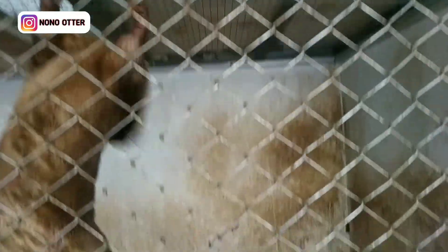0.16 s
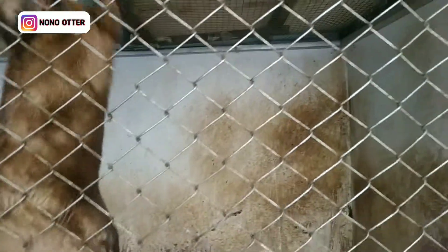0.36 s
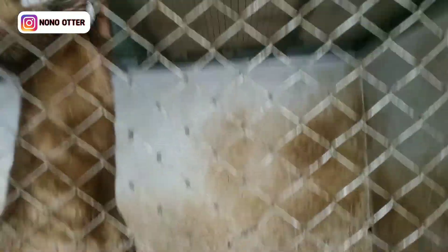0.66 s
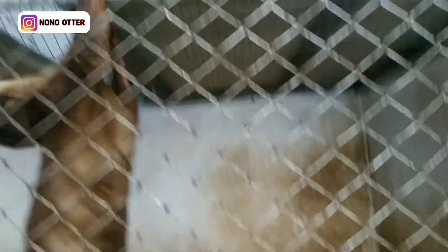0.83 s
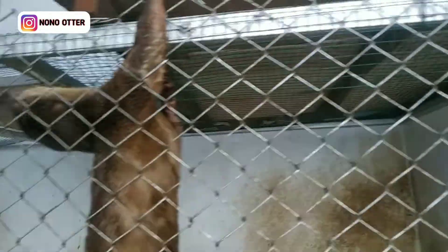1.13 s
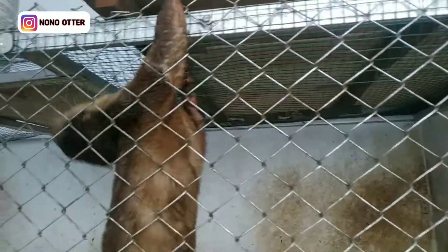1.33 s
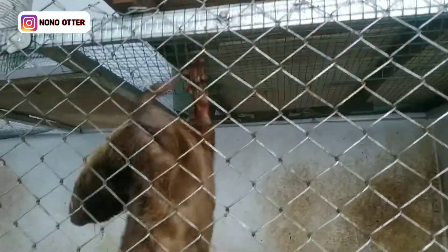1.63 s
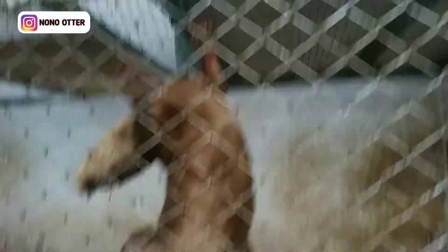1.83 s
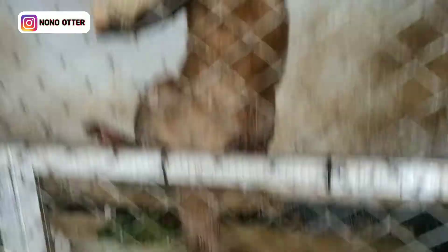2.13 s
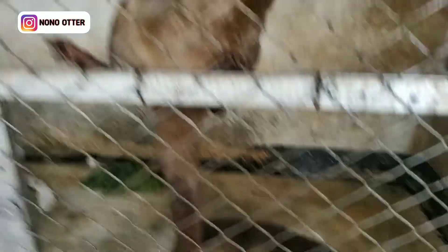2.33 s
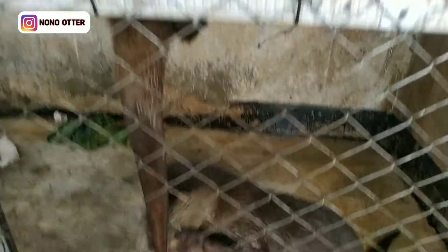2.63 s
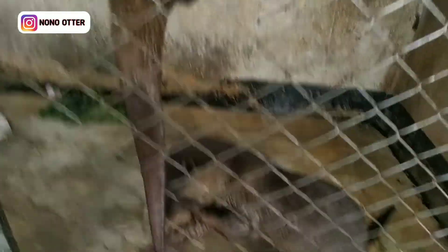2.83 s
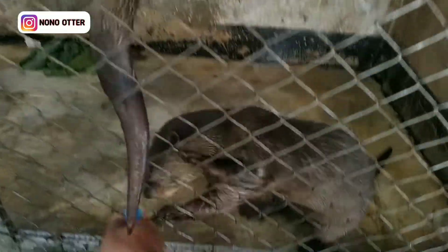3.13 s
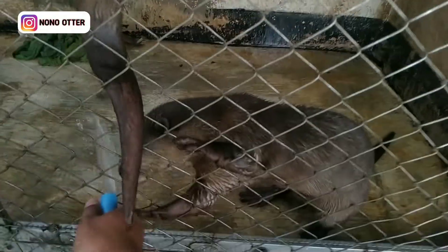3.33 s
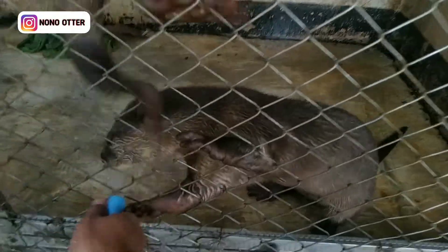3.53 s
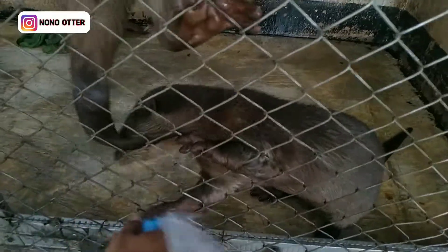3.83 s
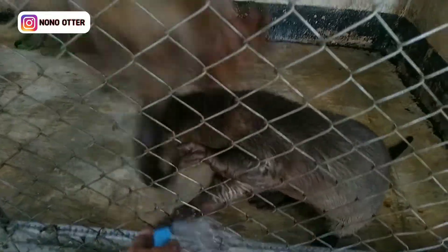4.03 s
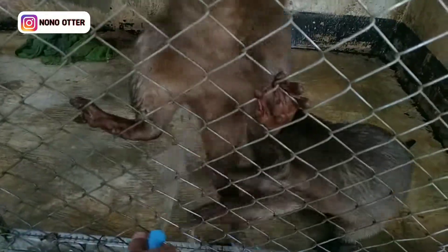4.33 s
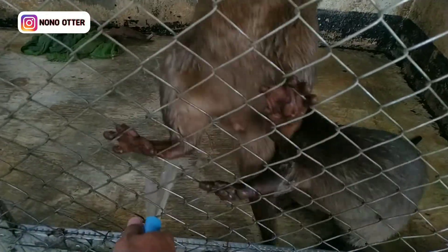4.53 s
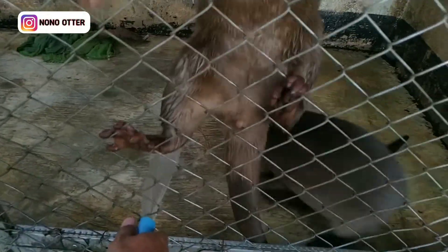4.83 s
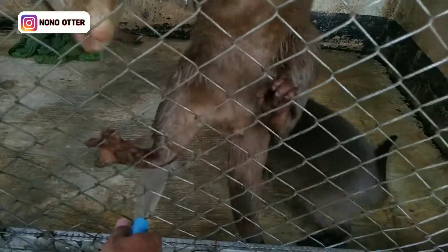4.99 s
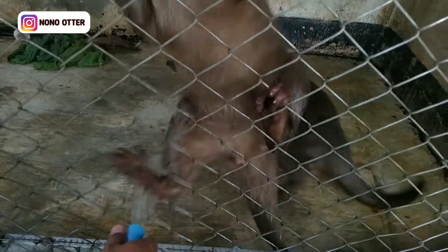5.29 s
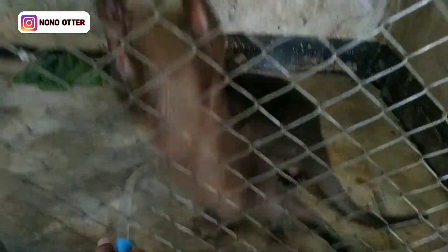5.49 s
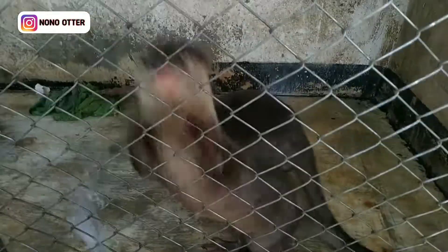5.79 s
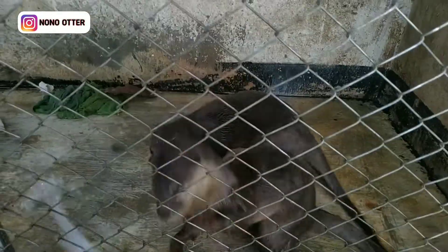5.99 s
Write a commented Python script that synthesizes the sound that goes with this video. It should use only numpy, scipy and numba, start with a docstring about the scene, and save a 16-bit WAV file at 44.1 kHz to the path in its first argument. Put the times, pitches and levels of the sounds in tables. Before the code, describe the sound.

Two small otters chirp, squeal and whine in a ringing concrete cage while a hose sputters and sharp ticks sound on the wire mesh.

```python
"""Small otters beg in a concrete cage with wire mesh while a hose sputters over an outdoor rumble and hum.
A chirp is already falling at the start; ticks on the mesh follow, then a squeal sinks into a long whine.
Falling whistled chirps go on, a second squeal and whine among them; later wet paws pat and the jet slaps.
The last squeal breaks into a whine of pulses and breath in a moving throat, which lasts to the end.
The bare walls ring after each call, and the recorder's gain control ducks the water under loud calls."""
import sys
import numpy as np
from scipy import signal
from scipy.fft import rfft, irfft, next_fast_len
from scipy.io import wavfile
from scipy.ndimage import uniform_filter1d, minimum_filter1d, map_coordinates
from numba import njit

SR = 44100
rng = np.random.default_rng(int(sys.argv[2]) if len(sys.argv) > 2 else 0)


def pcm_store(signal):
    """Save signal as 16-bit PCM."""
    levels = np.round(np.clip(np.atleast_2d(signal), -1, 1) * 32767)
    wavfile.write(sys.argv[1], SR, levels.astype(np.int16).T)


N = 271201
TIME = np.arange(N) / SR
EDGE_HZ = 15850  # upper band limit
LEAD_S = .1  # calls may begin this long before the scene opens


def amp(db):
    """Decibels to gain."""
    return 10 ** (np.asarray(db) / 20)


def unit(x):
    """Scales to rms 1."""
    return x / np.sqrt(np.mean(x ** 2) + 1e-20)


def read(points, hz):
    """Reads a table on a log-frequency axis."""
    f, value = np.transpose(points)
    return np.interp(np.log(hz + 1), np.log(f + 1), value)


def add(mix, s, sound):
    """Mixes a sound in at time s."""
    part = mix[..., max(round(s * SR), 0):][..., :sound.shape[-1]]
    part += sound[..., :part.shape[-1]]


def wander(size, rate):
    """A smooth random curve of rms about 1 that changes about rate times a second."""
    knots = rng.standard_normal(size + 8)[:int(size * rate / SR) + 8]
    position = np.arange(size) * rate / SR + 2
    return map_coordinates(knots, [position], order=2, mode="nearest")


def resonate(x, modes):
    """Passes a sound through parallel resonances with steep skirts."""
    out = 0
    for hz, width, db in modes:
        # two passes narrow the peak, so each one is 1.55 times as wide
        b, a = signal.iirpeak(min(hz, SR / 2.2), hz / width / 1.55, SR)
        once = signal.lfilter(b, a, x)
        out = out + amp(db) * signal.lfilter(b, a, once)
    return out


def glide(x, hz, width):
    """A steep resonance that follows the curve hz: shifted to zero, smoothed twice, shifted back."""
    turn = np.exp(2j * np.pi * np.cumsum(hz) / SR)
    r = np.exp(-np.pi * width * 1.55 / SR)
    smoothed = signal.lfilter([(1 - r) ** 2], [1, -2 * r, r * r], x / turn)
    return 2 * (turn * smoothed).real


def controls(rows, fade_s=.006):
    """A call's start, soft edges and control curves, sample by sample."""
    s, *columns = np.transpose(rows)
    t = np.arange(s.min(), s.max() + .003, 1 / SR)
    to_edge = np.minimum(t - t[0], t[-1] - t)
    edges = np.sin(np.pi / 2 * np.clip(to_edge / fade_s, 0, 1)) ** 2
    return t[0], edges, [np.interp(t, s, c) for c in columns]


# the chirps, each a top note, a tumble and a gliding low note:
# (start [s], top [s], fall [s], low [s], opening pitch [Hz], top pitch [Hz], pitch as the fall begins [Hz],
#  low pitch [Hz], end pitch [Hz], base level of top [dB], of fall [dB], of low [dB],
#  level of the direct path [dB], lag of the left microphone [samples])
CHIRP_CALLS = [(-.098, 0.013, 0.081, 0.017, 7690, 7840, 7970, 4100, 4350, -6.5, 0.5, -13.5, -3, 1),
               (1.244, 0.049, 0.043, 0.022, 7900, 8350, 7770, 4615, 4465, -8, -6, 0, -13, 1),
               (2.178, 0.037, 0.043, 0.027, 9280, 8350, 8420, 4274, 3930, -4.5, 2, -3, -7, 0),
               (2.754, 0.028, 0.048, 0.02, 8400, 8250, 8100, 4185, 3940, -4, -3.5, -11, -7.5, 1),
               (3.297, 0.036, 0.038, 0.029, 8520, 9040, 8560, 4920, 3500, -1.5, 4.5, 1, -7.5, 2),
               (3.785, 0.03, 0.04, 0.033, 8080, 8570, 8850, 5020, 3470, -3, -5.5, 0, -5.5, 2),
               (4.79, 0.041, 0.031, 0.013, 7960, 8390, 8500, 4660, 4410, -1, 2, 1, -5.5, 1),
               (5.529, 0.02, 0.034, 0.019, 9700, 9170, 8730, 4680, 4400, -9.5, -4.5, -3, -4, 0)]


def chirping_otter():
    """The nearer otter, already calling: each chirp arrives directly at its own strength and rings the cage."""
    lead = round(LEAD_S * SR)
    chirps, direct = np.zeros(lead + N), np.zeros((2, lead + N))
    for *shape, facing_db, lag in CHIRP_CALLS:
        start, sound = whistle(chirp(*shape), jitter=.009, jitter_rate=900, shimmer=1.6, flutter_db=1.5,
                               third_db=-25, half_db=-40, hoarse_db=-24)
        add(chirps, start + LEAD_S, sound)
        heard = ears(sound, balance_db=2.0, count=max(round(lag), 0))
        add(direct, start + LEAD_S, amp(facing_db) * heard)
    return (direct + cage(chirps, tail_db=-15.5))[:, lead:]


# one curve a squeal, the falling start of a whine:
# (time [s], pitch [Hz], level [dB], roughness [0-1], second harmonic [dB re the fundamental])
SQUEAL_CURVES = [
    [(.775, 5500, -32, 0.5, -20), (.793, 6660, -25, .4, -14), (.811, 5400, -20, 0.58, 8),
     (.822, 3910, -11, 0.48, -11), (.853, 2318, -9, 0.26, -7), (.868, 2070, -23, 0.7, -14),
     (.89, 1640, -45, 0.7, -6), (.95, 1602, -37, 0.3, -4), (1.0, 1030, -44, 0.4, 11)],
    [(2.572, 5500, -29, 0.54, 1), (2.598, 5700, -23.5, 0.63, 6.5), (2.611, 3880, -22.5, 0.9, 4),
     (2.622, 2790, -15, 0.84, -11), (2.645, 2400, -28, 0.84, -23), (2.67, 1960, -23, 0.3, -24)],
    [(5.835, 5350, -23, 0.56, -19), (5.85, 4000, -28.5, 0.5, -7), (5.868, 3184, -31, 0.4, 4.5),
     (5.905, 3400, -24.5, 0, -6), (5.935, 3137, -36, 0.74, -4), (5.96, 2544, -19.5, 0.4, -3),
     (5.982, 2370, -25.5, 0.78, 2.5), (6.0, 2250, -38, 0.9, -16)],
]
# one curve a whine: (time [s], pitch [Hz], relative level of the throat [dB], roughness [0-1],
#  relative level of the open mouth's rasp [dB], limp of the pulses [0-1], factor on the throat's resonances [-])
WHINE_CURVES = [
    [(.995, 499, -28, .15, -42, .1, 0.93), (1.06, 594.3, -32.5, 0.17, -24, 0.07, 1.08),
     (1.15, 643.6, -30, 0.15, -21, 0.35, 0.87), (1.24, 663.5, -23, 0.23, -19.5, 0.35, 0.93),
     (1.32, 640, -27.5, 0.17, -27.5, 0.8, 0.82), (1.42, 626, -31, 0.26, -19.5, 0.97, 0.91),
     (1.48, 612.6, -17, 0.52, -22, 0.95, 1.02), (1.6, 599, -17.5, 0.56, -22, 0.55, 1.01),
     (1.655, 609.4, -19.5, 0.26, -37, 0.18, 1.05), (1.68, 620, -25, 0.23, -36, 0.6, 1.09),
     (1.73, 657.7, -15.5, 0.31, -22.5, 0.45, 1.054), (1.79, 647.6, -17.5, 0.39, -28, 0.2, 1.01),
     (1.84, 631.3, -22, 0.4, -41, 0.18, 0.83), (1.868, 626, -26.5, 0.2, -41, 0, 0.88),
     (1.882, 555.5, -47, .4, -42, 0.3, .92)],
    [(2.665, 980, -17.5, 0.04, -23, 0, 1), (2.72, 1096, -15, 0.26, -21.5, .1, 0.97),
     (2.748, 1082, -15, 0.34, -18, 0, 1), (2.768, 1017, -32, 0.4, -18, .1, 0.96)],
    [(2.772, 1086, -22, 0.1, -17, .1, 1), (2.795, 1153, -30, 0.3, -19, 0, 0.75),
     (2.82, 1057, -14.5, 0.17, -17, 0.3, 0.98), (2.834, 1024, -19, 0.03, -22, 0.4, 1),
     (2.865, 1109, -18.5, 0.05, -18, 0.2, 1), (2.91, 938.5, -18, 0, -35, 0, .93),
     (2.957, 953, -21, 0, -34, 0, 0.895), (2.968, 824, -28, 0.1, -36, 0, 0.89),
     (2.984, 770, -33, .05, -40, .1, 0.69)],
    [(5.985, 1102, -19, 0.2, -21, 0, 1.16), (6.005, 1112, -9, 0, -26, 0.1, 1.08),
     (6.022, 1085, -25, 0, -26, 0.2, 1.03), (6.042, 1135, -14, 0, -24, 0, 1.03),
     (6.06, 1230, -19.5, .35, -22, 0.1, 1.05), (6.085, 1108, -15, 0.18, -28, 0.25, 1.04),
     (6.112, 1101, -15, 0.01, -15.5, .15, 0.98), (6.131, 1096, -24, 0, -27, 0.3, 1.04),
     (6.147, 1100, -11.5, 0, -16, .15, 0.98)],
]


def whining_otter():
    """The other otter: breathy squeals and pulsed whines, heard directly and in the cage's strong ring."""
    lead = round(LEAD_S * SR)
    squeals, whines = np.zeros((2, lead + N))
    for rows in SQUEAL_CURVES:
        start, sound = whistle(rows, jitter=.018, jitter_rate=1500, shimmer=3, flutter_db=4,
                               third_db=-5, half_db=-15, hoarse_db=-8)
        add(squeals, start + LEAD_S, breathy(sound))
    for rows in WHINE_CURVES:
        start, sound = whine(rows)
        add(whines, start + LEAD_S, amp(-2.0) * sound)
    direct = ears(squeals, balance_db=5.0, count=2) + ears(whines, balance_db=0.0, count=4)
    return (direct + cage(squeals + whines, tail_db=-4.5))[:, lead:]


SETTLE_S = 0.0105  # the opening pitch gives way to the top note
SWELL_S, SWELL_DB = 0.013, -6.5  # the top note swells from this far below
LOW_DB_PER_OCTAVE = 54  # the low note's level follows its glide
WAVER, WAVER_PER_S = 0.0142, 139.5  # unsteadiness of pitch after the fall (share, per s); half as much early on
TOP_ROUGH, OVERTONE_DB = 0.41, -20  # roughness on the held notes, rising to 1 in the fall; second harmonic
# uneven steps of the fall, with dips in level:
# (share of the fall's time [0-1], height from low to top note [0-1], change of level [dB])
TUMBLE_STEPS = [(0, 1, 6), (.03, .85, -2), (.24, .78, -1), (.3, .68, -11), (.34, .52, 0), (.68, .36, .5),
                (.92, .15, -5), (1, 0, 0)]


def chirp(start, top_s, fall_s, low_s, opening_hz, top_hz, brink_hz, low_hz, end_hz, top_db, fall_db, low_db):
    """The course of one chirp, as rows like a squeal's: it settles on the top note, tumbles and glides out low."""
    t = np.arange(0, top_s + fall_s + low_s, 1 / SR)
    share, heights, steps_db = np.transpose(TUMBLE_STEPS)
    fallen = (t - top_s) / fall_s
    height = np.interp(fallen, share, heights)
    top = np.interp(t, [SETTLE_S, top_s], [top_hz, brink_hz])
    top += (opening_hz - top) * np.exp(-(t / SETTLE_S) ** 10)
    low = low_hz + (end_hz - low_hz) * np.clip((t - top_s - fall_s) / low_s, 0, 1)
    waver = WAVER * np.clip(fallen + .5, .5, 1) * wander(len(t), WAVER_PER_S)
    hz = (low + height * (top - low)) * (1 + waver)
    db = np.interp(fallen, [0, .5, 1], [top_db, fall_db, low_db]) + np.interp(fallen, share, steps_db)
    db += SWELL_DB * np.maximum(1 - t / SWELL_S, 0)
    db += LOW_DB_PER_OCTAVE * np.log2(low / low_hz)
    rough = np.interp(fallen, [0, .5, 1], [TOP_ROUGH, 1, TOP_ROUGH])
    return np.column_stack([start + t, hz, db, rough, np.full(len(t), OVERTONE_DB)])


FLUTTER_PER_S = 260  # a rough cry breaks up at about this rate


def whistle(rows, jitter, jitter_rate, shimmer, flutter_db, third_db, half_db, hoarse_db, hoarse_width_hz=2200):
    """A tone with two overtones; as it roughens it flutters and gains a hoarse skirt and an octave undertone."""
    start, edges, (hz, db, rough, second_db) = controls(rows)
    size, rough = len(hz), np.clip(rough, 0, 1)
    unsteady_hz = hz * (1 + jitter * rough * wander(size, jitter_rate))
    phase = 2 * np.pi * np.cumsum(unsteady_hz) / SR
    tone = np.zeros(size)
    for k, harmonic_db in enumerate([0, second_db, second_db + third_db], 1):
        tone += amp(harmonic_db) * np.sin(k * phase) * (k * hz < SR / 2)
    skirt = wander(size, hoarse_width_hz) * np.sin(phase) + wander(size, hoarse_width_hz) * np.cos(phase)
    undertone = np.sin(phase / 2)
    tone += rough ** 2 * (amp(half_db) * undertone + amp(hoarse_db) * skirt)
    tremble_db = shimmer * wander(size, jitter_rate) + flutter_db * wander(size, FLUTTER_PER_S)
    return start, np.sqrt(2) * tone * edges * amp(db + rough * tremble_db)


def breathy(sound, hiss_db=-19, hiss_hz=13500, hiss_width_hz=4000):
    """A harsh hiss of air rides on a squeal and follows its loudness."""
    loudness = np.sqrt(abs(uniform_filter1d(sound ** 2, size=441)))
    hiss = unit(resonate(rng.standard_normal(len(sound)), [(hiss_hz, hiss_width_hz, 0)]))
    return sound + amp(hiss_db) * loudness * hiss


VOICE_LOW_HZ = 350  # throat and mouth pass little below this
# the chest hardly follows the throat, and fades as the voice turns rough [dB, dB per dB, dB]
CHEST_DB, CHEST_FOLLOW, CHEST_ROUGH_DB = -22.5, 0.28, -12
# in a clean voice strain equals the rasp at this pitch, and eases as the voice rises
STRAIN_HZ, STRAIN_DB_PER_OCTAVE = 576, -17
STRAIN_ROUGH_DB = 8  # a fully rough voice strains this much more
UNEVEN_DB, UNEVEN_PER_S = 4.5, 45  # the strained resonances swell and fade
QUAVER_DB, QUAVER_PER_S = 1.5, 60  # the level of a whine trembles
CREAK = .005  # the pitch always creaks a little (share)
# resonances of a whine, each table (frequency [Hz], width [Hz], relative level [dB]):
# low ones of the chest
CHEST_MODES = [(790, 780, -2.5), (1270, 360, 1.5)]
# those of the throat, before the opening factor moves them
THROAT_MODES = [(2009, 190, -2), (2272, 180, 8), (2420, 69, 0.5)]
# those of a strained voice
STRAIN_MODES = [(3310, 470, 0.33), (3650, 380, -1.4)]
# high ones of the open mouth
MOUTH_MODES = [(5000, 1600, 1.5), (6900, 370, 8.5), (8490, 1700, 7), (10700, 3000, -3.5), (13300, 7600, -4)]


def whine(rows, jitter=.005, rough_jitter=0.033, limp_turns=0.053, tripling=0.71, strain_noise=0.16):
    """Vocal-fold pulses and puffs of air ring a moving throat; a limping beat growls between the harmonics."""
    start, edges, (hz, throat_db, rough, rasp_db, limp, opening) = controls(rows)
    size, rough = len(hz), np.clip(rough, 0, 1)
    slow_jitter = jitter * wander(size, 60.1)
    creak = (CREAK + rough_jitter * rough) * wander(size, 400)
    turns = np.cumsum(hz * (1 + slow_jitter + creak)) / SR
    # pulses come early and late by turns
    turns = turns + limp_turns * limp * (1 + wander(size, 39.8) / 2) * np.cos(np.pi * turns)
    harmonics = range(1, int(EDGE_HZ / hz.max()) + 1)
    folds = unit(sum(np.cos(2 * np.pi * k * turns) for k in harmonics))
    # roughness groups the pulses in threes
    folds *= 1 + tripling * rough * np.cos(2 * np.pi * turns / 3 + wander(size, 30))
    puffs = unit((1.1 + np.exp(-(turns % 1) / 0.056)) * rng.standard_normal(size))
    high_pass = signal.butter(3, VOICE_LOW_HZ, "high", fs=SR, output="sos")
    drive = signal.sosfilt(high_pass, (1 - rough) * folds + rough * puffs)
    raspy = drive + strain_noise * puffs

    chest = resonate(folds + rough * puffs / 2, CHEST_MODES)
    chest_db = CHEST_DB + CHEST_FOLLOW * throat_db + CHEST_ROUGH_DB * rough
    throat = sum(amp(db) * glide(drive, f * opening, width) for f, width, db in THROAT_MODES)
    strain = 0
    for mode in STRAIN_MODES:  # each swells and fades on its own
        strain = strain + resonate(raspy, [mode]) * amp(UNEVEN_DB * wander(size, UNEVEN_PER_S))
    strain_db = rasp_db + STRAIN_DB_PER_OCTAVE * np.log2(hz / STRAIN_HZ) + STRAIN_ROUGH_DB * rough
    mouth = resonate(raspy, MOUTH_MODES)

    parts = [(chest, chest_db), (throat, throat_db), (strain, strain_db), (mouth, rasp_db)]
    quaver = amp(QUAVER_DB * wander(size, QUAVER_PER_S))
    return start, edges * quaver * sum(amp(db) * unit(sound) for sound, db in parts)


def ears(x, balance_db, count):
    """The right microphone hears the otter count samples earlier and twice balance_db louder than the left."""
    late = np.pad(x, (count, 0))[:len(x)]
    return np.array([late * amp(-balance_db), x * amp(balance_db)])


# decay of the cage's tail: (frequency [Hz], time to fall by 60 dB [s])
CAGE_DECAY = [(300, 0.44), (2000, 0.45), (4500, 0.68), (8500, 0.51), (15000, 0.82)]
# early echoes of floor and walls, a list each for the left and the right microphone: (delay [s], level [dB])
EARLY_ECHOES = [
    [(.0021, -15), (.0083, -18), (.019, -22)],
    [(.0016, -15), (.0091, -18), (.0175, -22)],
]


def cage(x, tail_db):
    """Floor and walls send back a few early echoes, then a dense tail whose top treble rings longest."""
    build_up = np.clip(np.arange(SR) / SR / .03 - .5, 0, 1)  # silent for 15 ms, full at 45 ms
    taps = rng.standard_normal((2, SR)) * (rng.random((2, SR)) < .2) * build_up
    hz, t, z = signal.stft(taps, SR, nperseg=256)
    decay = amp(-60 * t / read(CAGE_DECAY, hz)[:, None])
    tail = signal.istft(z * decay, SR, nperseg=256)[1]
    echo = amp(tail_db) * tail / np.linalg.norm(tail[0])
    for side, early in zip(echo, EARLY_ECHOES):
        for delay, db in early:
            side[round(delay * SR)] += amp(db)
    return signal.fftconvolve(x[None], echo, axes=1)[:, :len(x)]


SLAP_S, SLAP_FIZZ = 0.032, 0.11  # time from a slap's peak to 1/e of its rise; share that the spray takes
SPUTTER_DB = 1.5  # depth of the jet's sputter
# the hose's uneven flow, which surges and slackens:
# (time [s], relative level of splash on floor and fur [dB], relative level of the spray's fizz [dB])
WATER_FLOW = [(0, -40, -34.5), (.55, -37.5, -33.5), (.8, -42.5, -32), (1.2, -46, -31), (1.701, -44, -29.5),
              (1.949, -39.5, -41), (2.02, -47, -38.5), (2.07, -47, -38.5), (2.095, -42.5, -30.5),
              (2.47, -42, -35.5), (3.0, -34.5, -37.5), (3.139, -41.5, -46.5), (3.28, -37, -37),
              (3.6, -38.5, -37), (3.78, -41, -32), (4.25, -34.5, -30.5), (4.33, -39.5, -26.5),
              (4.48, -37.5, -37.5), (4.625, -34.5, -40), (4.71, -34, -33), (4.79, -40.5, -35),
              (5.25, -35, -33.5), (5.55, -33, -37), (5.7, -39.5, -46), (5.765, -45, -37.5),
              (5.8, -35.5, -29.5), (5.92, -43.5, -32)]
# the jet slaps a body or a puddle: (time [s], rise of the splash [dB])
JET_SLAPS = [(.57, 2.5), (3.22, 5.5), (3.67, 8.5), (3.755, 4.5), (3.97, 5.5), (4.12, 7), (4.31, 9),
             (4.969, 8), (5.325, 7)]
# colour of the splash: (frequency [Hz], relative level per Hz [dB])
SPLASH_SPECTRUM = [(30, -42), (100, -17), (200, 1), (400, 0.5), (750, 6.5), (1400, 6), (2500, 0.5),
                   (5000, -1.5), (15000, -62)]
# colour of the spray: (frequency [Hz], relative level per Hz [dB])
SPRAY_SPECTRUM = [(500, -59), (1500, -11), (3000, 4.5), (6000, 5.5), (8000, 7), (11000, 5), (15500, 2.5)]


def hose(spray_gain_db=6.0, drops_db=-12, sputter_per_s=30):
    """The jet surges, sputters and slaps on floor and fur, and its spray fizzes and patters."""
    s, *columns = np.transpose(WATER_FLOW)
    splash_db, spray_db = (np.interp(TIME, s, c) + SPUTTER_DB * wander(N, sputter_per_s) for c in columns)
    slap_db = sum(db * np.exp(-((TIME - at) / SLAP_S) ** 2) for at, db in JET_SLAPS)
    splash = amp(splash_db + slap_db) * noise(SPLASH_SPECTRUM, patchy_db=3.0, flicker_db=-0.3)
    fizz = amp(spray_gain_db) * noise(SPRAY_SPECTRUM, patchy_db=4.0, flicker_db=1.0)
    spray = amp(spray_db + SLAP_FIZZ * slap_db) * (fizz + amp(drops_db) * drops())
    return splash * amp([[.7], [-.7]]) + spray * amp([[-1.7], [1.6]])  # left and right balance [dB]


# likeness of the two microphones in noise: (frequency [Hz], left-right correlation [-])
STEREO_LIKENESS = [(50, 0.81), (200, 0.94), (600, 0.21), (1500, 0.017), (4000, 0.0099), (12000, 0.015)]


def noise(spectrum, patchy_db, flicker_db):
    """Stereo noise of rms 1 with drifting patches and a flicker shared by all pitches."""
    frames, hz = N // 128 + 6, np.fft.rfftfreq(512, 1 / SR)
    a, b, c, d, patches = rng.standard_normal((5, frames, len(hz))).transpose(0, 2, 1)
    patches = unit(uniform_filter1d(uniform_filter1d(patches, 14, axis=0), 9, axis=1))
    same = np.clip(read(STEREO_LIKENESS, hz), -1, 1)[:, None]
    left = a + 1j * b
    right = same * left + np.sqrt(1 - same ** 2) * (c + 1j * d)
    flicker = unit(uniform_filter1d(rng.standard_normal(frames), 3))
    z = np.array([left, right]) * amp(patchy_db * patches + flicker_db * flicker)
    white = signal.istft(z, nperseg=512, noverlap=384)[1][:, :N]
    size = next_fast_len(N, True)
    colour = amp(read(spectrum, np.fft.rfftfreq(size, 1 / SR)))
    return unit(irfft(rfft(white, size) * colour, size)[:, :N])


def drops(per_s=500, cycles=13.0, count=24):
    """Single drops: tiny decaying pings of many pitches and sizes, higher ones dying sooner."""
    out, t = np.zeros((2, N)), np.arange(256) / SR
    for hz in np.geomspace(2000, 13000, count):
        at = np.flatnonzero(rng.random(N) < per_s / count / SR)
        train = np.zeros((2, N))
        train[:, at] = rng.standard_normal((2, len(at)))
        ping = np.sin(2 * np.pi * hz * t) * np.exp(-t * hz / cycles)
        out += signal.oaconvolve(train, ping[None], axes=1)[:, :N]
    return unit(out)


TICK_T60_S, CRACK_T60_S = 0.063, .025
# faint ticks fall at random: their relative level and the range of their ring
FAINT_TICK_DB, FAINT_TICK_LOW_HZ, FAINT_TICK_HIGH_HZ = -46, 2900, 9000
# the sharpest ticks on the mesh and wet floor: (time [s], relative level [dB], ring [Hz])
SHARP_TICKS = [(.168, -22, 5050), (.222, -24, 11000), (.362, -24, 5500), (.392, -20, 6900),
               (.426, -23, 7000), (.4865, -22, 3150), (.655, -25, 3400), (.708, -24, 9500),
               (1.9745, -27, 4000), (2.0303, -20, 6400), (2.082, -24, 3060), (2.099, -23, 2500),
               (2.157, -23, 10000), (2.514, -17, 2880), (3.2716, -26, 4500), (3.578, -20, 10700),
               (4.574, -27, 7000), (4.6362, -20, 8970), (4.715, -22, 9500), (5.2056, -22, 5950),
               (5.2375, -21, 7380), (5.3344, -23, 3640), (5.7705, -21, 4590), (5.7972, -21, 7050)]


def ticks(ring_db=-3.0, width_share=0.24, count=16):
    """Each tick is a sharp crack and a short damped rattle around one pitch; faint ones fall at random."""
    out, t = np.zeros((2, N)), np.arange(SR // 8) / SR
    crack_shape = amp(-4 - 60 * t / CRACK_T60_S)
    faint = []
    for when, height in rng.random((count, 2)):
        hz = FAINT_TICK_LOW_HZ * (FAINT_TICK_HIGH_HZ / FAINT_TICK_LOW_HZ) ** height
        faint.append((when * N / SR, FAINT_TICK_DB, hz))
    for s, db, hz in list(SHARP_TICKS) + faint:
        rattle, crack = rng.standard_normal((2, 2, len(t)))
        ring = unit(resonate(rattle, [(hz, hz * width_share, 0)])) * amp(ring_db - 60 * t / TICK_T60_S)
        bright_crack = np.gradient(crack, axis=1) * np.sqrt(3)
        add(out, s, amp(db) * (ring + crack_shape * bright_crack))
    return out


# wet paws on the floor: (time [s], peak level [dB], hollow ring [Hz])
PAW_PATS = [(3.208, -37, 1400), (4.638, -32.5, 1310), (4.952, -27, 750), (5.008, -35.5, 1150),
            (5.662, -35, 915)]


def pats(width_share=0.21, rise_s=0.0073):
    """A wet paw lands with a soft, hollow pat: resonant noise that rises briefly and dies."""
    out, t = np.zeros((2, N)), np.arange(SR // 8) / SR
    envelope = t / rise_s * np.exp(1 - t / rise_s)
    for s, db, hz in PAW_PATS:
        splat = rng.standard_normal(len(t)) + rng.standard_normal((2, len(t))) / 2  # mostly shared by both sides
        add(out, s, amp(db) * unit(resonate(splat, [(hz, hz * width_share, 0)])) * envelope)
    return out


# colour of the outdoor rumble: (frequency [Hz], relative level per Hz [dB])
RUMBLE_SPECTRUM = [(25, -48), (60, -46), (120, -30), (170, -2.5), (230, 0), (400, -1.5), (700, -5),
                   (2000, -41)]
# a faint hum, each tone of which swells once:
# (frequency [Hz], level outside the swell [dB], time of the swell [s], time from its peak to 1/e [s], swell [dB])
HUM_TONES = [(289.4, -63.5, 0.57, .25, 18.5), (378.6, -50.5, 0.36, 0.18, 7), (752, -56, 5, 0.16, 18),
             (1136, -58.5, 4.86, .4, 10)]


def background(rumble_db=-45.0, hum_waver_db=5.5):
    """A low outdoor rumble with a wavering hum whose tones come and go."""
    hum = 0
    for hz, db, swell_s, span_s, swell_db in HUM_TONES:
        swell = swell_db * np.exp(-((TIME - swell_s) / span_s) ** 2)
        level_db = db + swell + hum_waver_db * wander(N, 6)
        phase = 2 * np.pi * np.cumsum(hz * (1 + 0.01024 * wander(N, 14))) / SR
        hum = hum + amp(level_db) * np.sin(phase)
    rumble = amp(rumble_db) * noise(RUMBLE_SPECTRUM, patchy_db=2.0, flicker_db=1.0)
    return hum + rumble * amp([[.7], [-.7]])  # left and right balance [dB]


def scene():
    """Two otters over the hose, the ticks, the pats and the outdoor background."""
    return chirping_otter() + whining_otter() + hose() + ticks() + pats() + background()


@njit
def follow(want_db, fall, recover):
    """The gain reduction closes in on its goal and lets go at a steady rate."""
    out, now = np.zeros(len(want_db)), want_db[0]
    for i in range(len(want_db)):
        if want_db[i] > now:
            now = now + fall * (want_db[i] - now)
        else:
            now = max(now - recover, want_db[i])
        out[i] = now
    return out


def record(dry, threshold_db=-17.0, squeeze=1.0, attack_s=0.028, recover_db_per_s=89.5):
    """Gain control ducks everything under loud calls; a limiter holds the peaks, then the band limit."""
    power_db = 10 * np.log10(abs(uniform_filter1d((dry ** 2).mean(0), 128)) + 1e-12)
    excess_db = np.maximum(power_db - threshold_db, 0)
    duck_db = follow(squeeze * excess_db, 1 / (attack_s * SR), recover_db_per_s / SR)
    ducked = dry * amp(-duck_db)
    peak = uniform_filter1d(-minimum_filter1d(-abs(ducked).max(0), size=256), size=128)
    limited = ducked / np.maximum(peak / .79, 1)
    band_limit = signal.firwin(511, EDGE_HZ, window=("kaiser", 9), fs=SR)
    return signal.oaconvolve(limited, band_limit[None], "same")


dry = scene()
out = record(dry)
pcm_store(out)
```